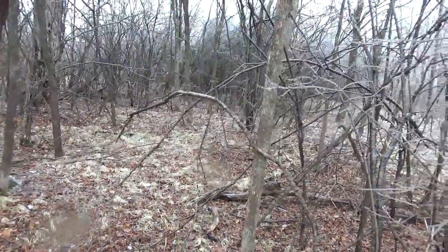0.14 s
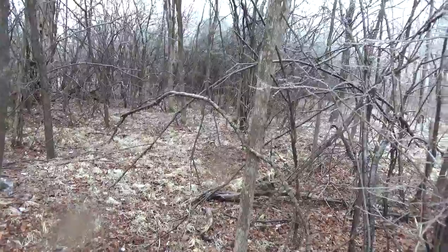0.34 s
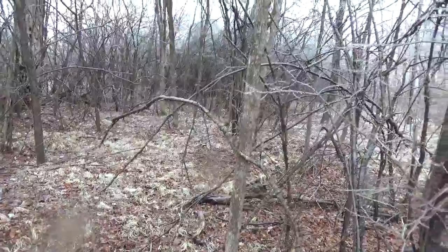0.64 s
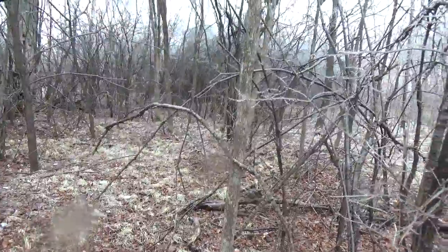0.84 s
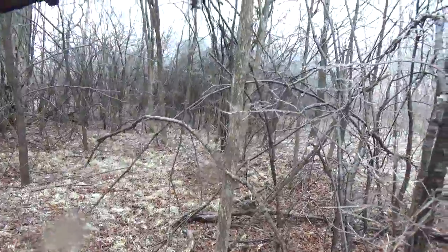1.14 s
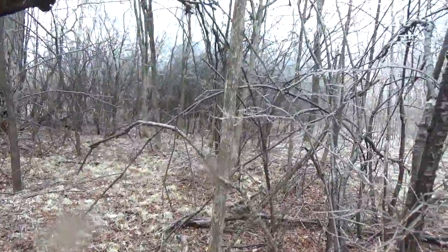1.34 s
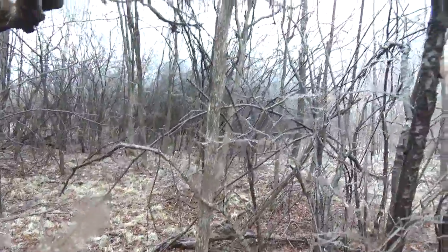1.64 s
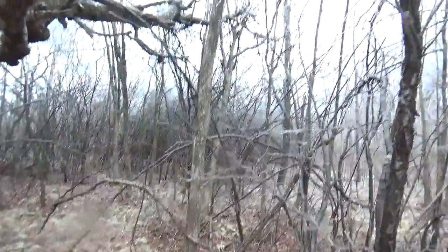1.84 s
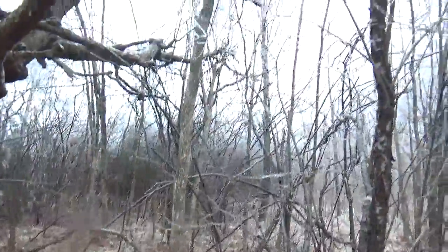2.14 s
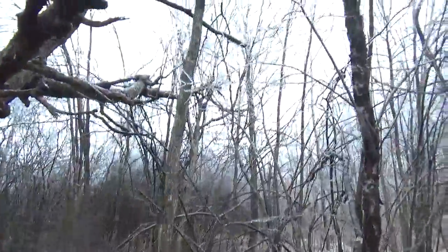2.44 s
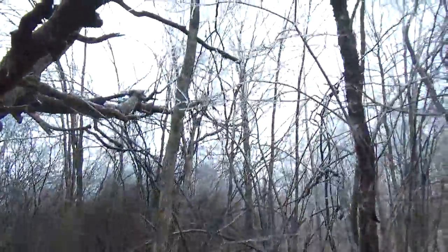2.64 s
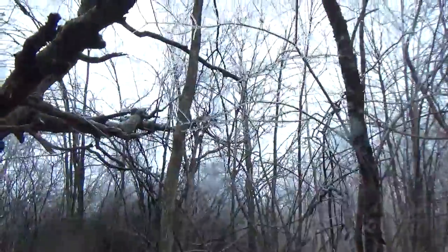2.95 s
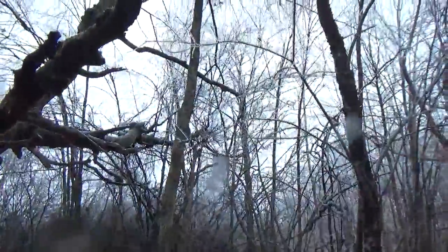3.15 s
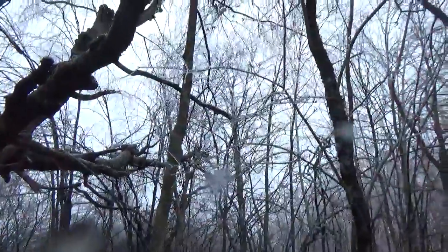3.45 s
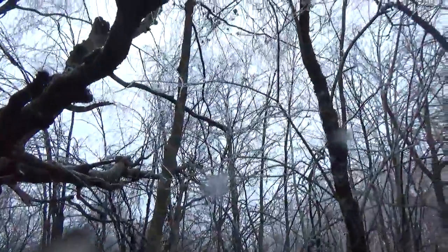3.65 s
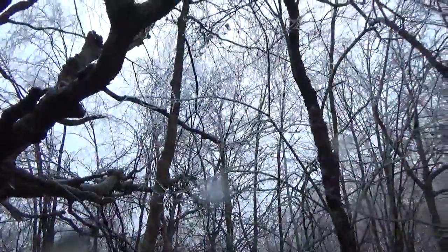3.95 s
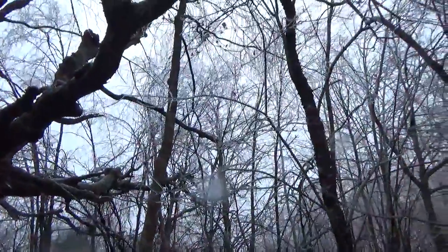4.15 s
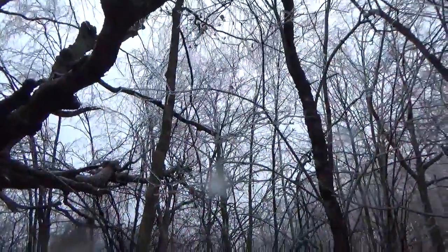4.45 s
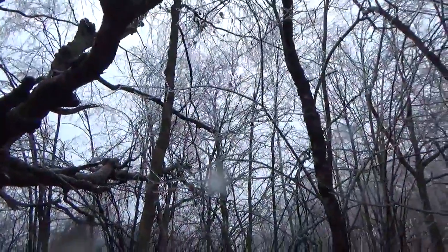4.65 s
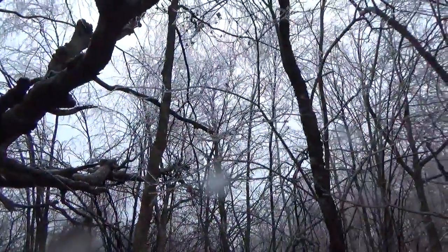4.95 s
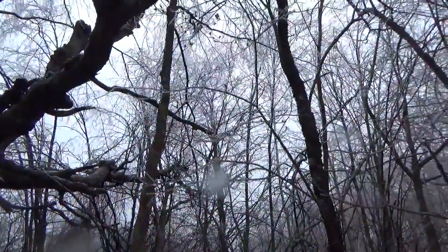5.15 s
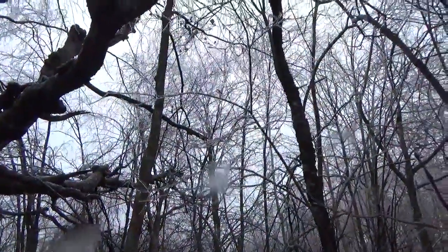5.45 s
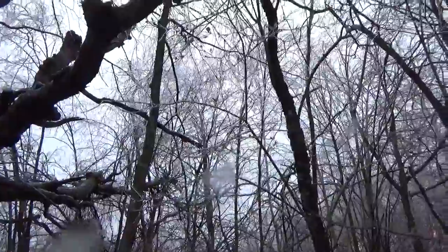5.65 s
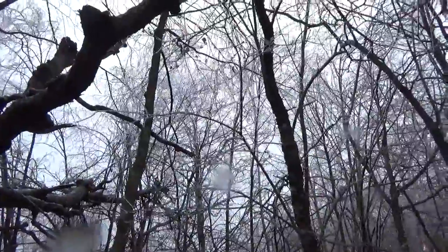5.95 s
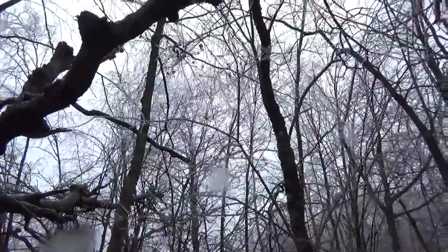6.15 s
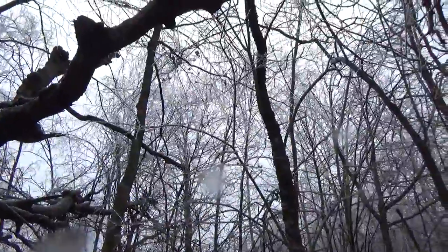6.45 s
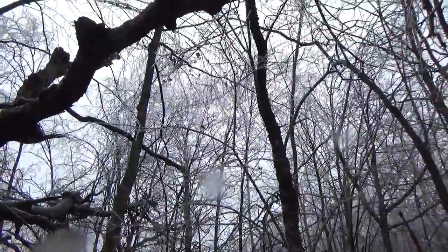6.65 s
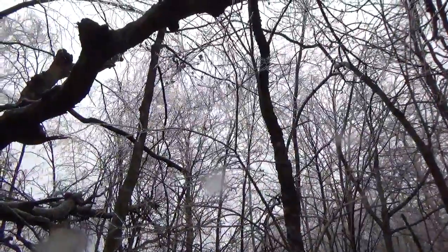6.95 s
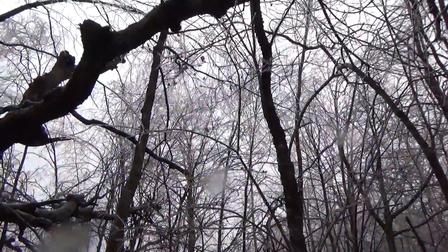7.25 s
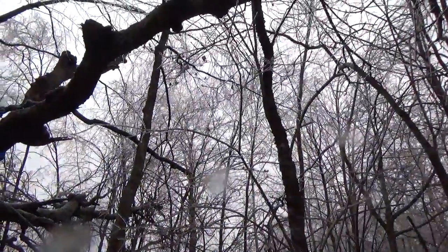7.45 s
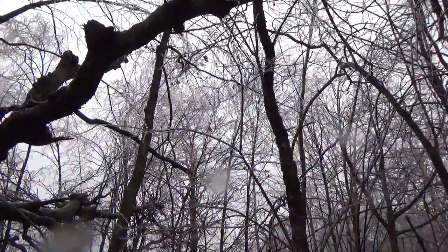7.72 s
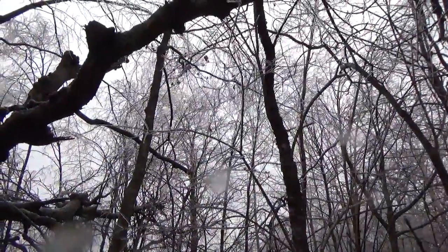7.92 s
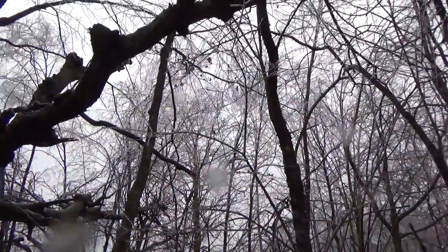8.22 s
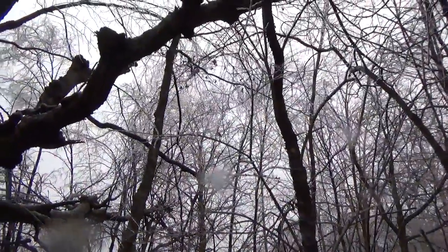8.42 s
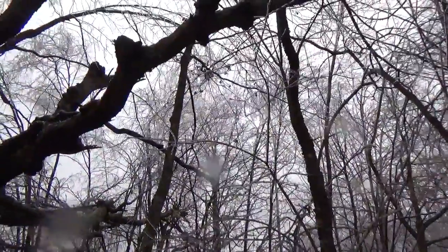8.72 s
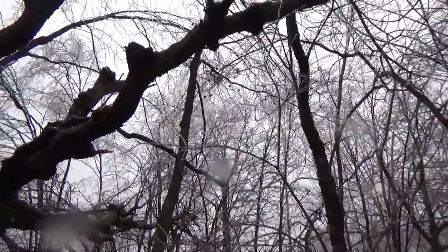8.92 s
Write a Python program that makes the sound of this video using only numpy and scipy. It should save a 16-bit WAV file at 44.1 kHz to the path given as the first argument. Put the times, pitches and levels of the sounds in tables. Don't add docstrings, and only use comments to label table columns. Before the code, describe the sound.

Fine sleet sizzles evenly through leafless trees while close pellets snap and click, densest early on, over a faint low murmur and light wind bumps.

```python
import sys
import numpy as np
from scipy import signal
from scipy.fft import rfft, irfft, next_fast_len
from scipy.io import wavfile
from scipy.ndimage import uniform_filter1d, map_coordinates

SR = 44100
rng = np.random.default_rng(int(sys.argv[2]) if len(sys.argv) > 2 else 0)


def dump_mix(stems):
    frames = np.atleast_2d(stems).T
    limited = np.clip(frames, -1, 1)
    pcm = np.round(limited * 32767).astype(np.int16)
    wavfile.write(sys.argv[1], SR, pcm)


def gain_from_decibels(decibels):
    exponent = np.asarray(decibels, float) / 20
    return 10 ** exponent


N = 400428

# [t/s, level/dB]
RAIN_STRENGTH = [(0.0, -39), (0.93, -38.5), (1.09, -38.5), (1.97, -38), (2.17, -40), (2.65, -39),
                 (3.19, -39.5), (3.87, -41), (4.78, -39), (5.06, -40), (6.32, -40.5), (6.55, -42),
                 (7.26, -39.5), (7.66, -41.5), (8.52, -39.5), (9.08, -39)]
# [t/s, left over right/dB, murmur level/dB]
CAMERA_TURN = [
    (0, 0, -52.5),
    (.9, -0.5, -51.5),
    (3.2, -.5, -51),
    (3.5, -.7, -53.5),
    (6, -0.9, -53),
    (7.7, .5, -53),
    (9.08, .5, -52),
]
# [f/Hz, level per Hz/dB]
SIZZLE_TONE = [(1500, -50), (4000, -11), (6000, -9), (7500, -2), (9000, 2.8), (10300, -2), (11000, -5),
               (20000, -5)]
# [f/Hz, level per Hz/dB]
PATTER_TONE = [(300, -12.5), (800, -4.5), (1600, -1), (2800, 1), (4500, -1.5), (7000, -1.5), (12000, -16)]
# [f/Hz, level per Hz/dB]
MURMUR_TONE = [(40, -14), (90, -3), (150, -1), (300, -4.5), (600, -7.5), (1200, -12), (4000, -53)]
# [f/Hz, likeness/0 to 1]
LIKENESS = [(60, 0.97), (140, 0.98), (350, 0.89), (840, 0.71), (2010, 0.59), (4840, 0.54), (11600, 0.87)]
# (f/Hz, width/Hz, level/dB)
ENGINE = (112, 2.6, -61.5)
# [t/s, level/dB]
BREEZE_STRENGTH = [
    (0, -58.5),
    (3.6, -60),
    (4.7, -55.5),
    (5.5, -51.5),
    (5.7, -62.5),
    (7.6, -54),
    (9.08, -60),
]
# [f/Hz, level per Hz/dB]
BREEZE_TONE = [(15, -16), (28, -4.5), (60, -4), (95, -7), (200, -31)]
# [t/s, peak level/dB, f/Hz, left over right/dB]
LEAF_HITS = [(.1378, -30, 3070, -9), (.2408, -32, 2340, -4), (.5743, -31, 2850, 4),
             (.6007, -22.5, 1870, -3), (.72, -21.5, 1490, 0), (.9266, -28, 2440, -6),
             (2.4968, -25, 1350, 6), (6.2113, -22, 1440, -12), (.964, -28, 2010, -6),
             (1.0377, -24, 2630, -7), (1.0751, -29.5, 2510, 5), (1.2085, -32, 1600, -2),
             (1.3111, -32, 2600, -10), (.8725, -29, 3100, -3), (1.4696, -31, 2900, -4),
             (1.5611, -33, 1570, 1), (1.8653, -32, 3290, -6), (2.7879, -30, 2100, 5),
             (2.8145, -35, 1970, -11), (2.8936, -32, 1580, -4), (3.2067, -30, 2240, 5),
             (3.8171, -39, 1630, -1), (4.59, -31, 2190, -4), (6.3182, -26, 2700, 10),
             (6.7955, -43, 2700, 25), (6.8077, -30, 2720, -9), (7.3107, -29.5, 3010, 3),
             (7.3782, -33, 3040, 4), (8.5444, -29, 2500, -1)]
# [t/s, peak level/dB, f/Hz, left over right/dB]
TWIG_HITS = [(.148, -23.5, 3880, -5), (.3193, -21, 3200, -6), (.3277, -21, 4160, -5),
             (.3448, -24, 3120, -3), (.4645, -20, 5040, -3), (.4903, -27, 5860, -2),
             (.5932, -18.5, 3650, -4), (.6765, -16, 5800, -5), (.9107, -21, 4680, -4),
             (.9341, -29, 3080, -4), (1.0833, -22, 5960, 1), (1.342, -16.5, 4900, -4),
             (2.0733, -24, 5000, -4), (1.8073, -25, 5560, -4), (1.8498, -24, 4430, -2),
             (1.9766, -27, 5000, -2), (2.3859, -14.5, 3330, -3), (2.4547, -27, 4120, -3),
             (3.2066, -24, 6550, 1), (4.7977, -29, 3590, 1), (5.092, -28, 4340, -5),
             (5.6703, -30, 4390, 10), (6.1587, -29, 5280, -1), (7.0648, -29.5, 4680, -9),
             (7.1244, -28, 4210, -4), (7.1298, -23, 3270, 2), (7.2388, -32, 4180, 2),
             (7.9083, -26, 5980, -2), (8.3255, -24.5, 5070, -2), (8.3845, -21.5, 3380, 2)]
# [t/s, peak level/dB, f/Hz, left over right/dB]
GLAZE_HITS = [(.1845, -25, 7490, -1), (.7198, -14, 7200, -1), (.7201, -14, 9800, 1), (.743, -26, 8700, 2),
              (.751, -23, 9080, 1), (.9883, -24.5, 7000, -6), (1.3746, -24, 7650, -5),
              (1.5166, -25, 7750, -3), (1.6784, -24, 9010, 5), (1.8509, -24, 9500, -2),
              (1.9766, -16, 7900, -2), (2.0733, -15.5, 8300, -2), (2.1159, -18.5, 7400, -3),
              (2.4502, -24, 9730, -5), (2.6114, -23, 8850, 2), (2.788, -22.5, 8600, -2),
              (3.1735, -25, 8080, 2), (3.5375, -22, 8060, 4), (3.795, -29, 8000, 15), (3.978, -23, 8960, 1),
              (4.3124, -22, 8250, 1), (4.459, -23, 8930, 4), (4.8196, -17, 8750, 4), (6.3215, -25, 7200, 0),
              (7.3061, -23, 8860, 3), (7.7022, -21.5, 9200, 3), (8.0628, -24, 9000, -4),
              (8.293, -22, 8680, 1), (8.6297, -34, 8880, -3), (8.7474, -19.5, 8630, 3)]
# [t/s, level/dB, f/Hz, left over right/dB]
PLINK_DROPS = [
    (0.144, -37, 1710, -2),
    (0.464, -33, 1850, -4),
    (1.3103, -30.5, 1660, -7),
    (1.3474, -31.5, 1620, -3),
    (1.4672, -31, 1340, -2),
    (8.3255, -26, 5100, -2),
    (8.386, -40, 1790, 4),
]
# [t/s, level/dB, first f/Hz, last f/Hz, left over right/dB]
PLOP_DROPS = [
    (0.7206, -23, 1700, 700, 0),
    (.7463, -29.5, 800, 200, -2),
    (.7513, -21, 1280, 860, 1),
    (2.4974, -31, 710, 176, 3),
    (2.5024, -26, 2200, 905, 4),
    (4.7915, -32.5, 700, 530, 3),
    (6.2111, -22.5, 1300, 470, -2),
    (6.2188, -28, 450, 1070, -6),
]
# [t/s, length/s, level/dB, centre f/Hz]
SPRAYS = [(0.321, 0.024, -35, 4000), (0.445, 0.025, -33.5, 6300), (0.744, 0.011, -34, 700),
          (0.74, 0.033, -39, 210), (0.741, 0.018, -33, 2000), (4.8, 0.021, -41.5, 1100),
          (4.755, 0.022, -42, 990), (0.74, 0.04, -30, 7400), (0.928, 0.063, -44, 2400),
          (1.999, 0.036, -41, 9000), (2.095, 0.068, -33.5, 11000), (2.394, 0.026, -30.5, 11000),
          (2.496, 0.011, -33, 220), (2.441, 0.29, -45.5, 1600), (2.438, 0.22, -38.5, 9200),
          (8.203, 0.18, -44, 3400), (4.1, 0.24, -48, 10000), (4.451, 0.048, -34, 10500),
          (4.826, 0.12, -36.5, 11000), (6.153, 0.036, -36.5, 3500), (6.226, 0.02, -39, 900),
          (6.793, 0.028, -43.5, 2500), (8.297, 0.048, -38.5, 9700), (8.746, 0.045, -37.5, 6300)]
# [t/s, peak level/dB, f/Hz]
AIR_PUFFS = [
    (2.661, -40, 55.3),
    (3.85, -47, 45.2),
    (4.549, -34.5, 60),
    (4.77, -51, 45),
    (5.47, -43, 109),
    (7.734, -29.5, 42.7),
    (7.81, -56, 45),
    (8.0, -42, 45),
    (8.24, -48, 35),
]


def unit(x):
    return x / np.sqrt(np.mean(x ** 2) + 1e-20)


def along(points, hz):
    f, v = np.transpose(points)
    return np.interp(np.log(hz + 1), np.log(f + 1), v)


def curves(rows):
    s, *columns = np.transpose(rows)
    return [np.interp(np.arange(N) / SR, s, column) for column in columns]


def wobble(rate):
    knots = rng.standard_normal(int(N * rate / SR) + 4)
    return map_coordinates(knots, [np.arange(N) * rate / SR])


def filtered(x, response):
    m = next_fast_len(x.shape[-1] + 8192)
    spectrum = rfft(x, m) * response(np.fft.rfftfreq(m, 1 / SR))
    return irfft(spectrum, m)[..., :x.shape[-1]]


def panned(db):
    return gain_from_decibels(np.array([db / 2, -db / 2]))


def add(out, s, sound):
    part = out[:, max(round(s * SR), 0):][:, :sound.shape[1]]
    part += sound[:, :part.shape[1]]


def rush(tone, patchy_db):
    z = signal.stft(rng.standard_normal((2, N)), nperseg=256)[2]
    patches = uniform_filter1d(rng.standard_normal(z.shape[1:]), size=8, axis=0)
    patches = uniform_filter1d(patches, size=10, axis=1)
    pair = signal.istft(z * gain_from_decibels(patchy_db * unit(patches)), nperseg=256)[1][:, :N]

    def middle_and_side(hz):
        angle = np.arccos(np.clip(along(LIKENESS, hz), -1, 1)) / 2
        return gain_from_decibels(along(tone, hz)) * np.array([np.cos(angle), np.sin(angle)])

    mid, side = filtered(pair, middle_and_side)
    return unit(np.array([mid + side, mid - side]))


def pitter(count, hz, octaves, cycles, scatter_db):
    when, size, side, tone, phase = rng.random((count, 5)).T[..., None]
    pitch = hz * 2 ** (octaves * (2 * tone - 1))
    n = np.arange(SR // 300)
    ring = np.sin(2 * np.pi * (pitch * n / SR + phase)) * np.exp(-pitch * n / SR / cycles)
    ring = ring * gain_from_decibels(-scatter_db * np.log(size + .02))
    at = ((when * N).astype(int) + n).ravel()
    gains = panned(14 * (side - .5))
    return unit(np.array([np.bincount(at, (gain * ring).ravel(), N)[:N] for gain in gains]))


def rainfall():
    fall_db, = curves(RAIN_STRENGTH)
    mean_db = fall_db.mean()
    swing_db = fall_db - mean_db
    flurry = wobble(25)
    ice = rush(SIZZLE_TONE, patchy_db=1.12)
    ice = ice + gain_from_decibels(-11.5) * pitter(count=3000, hz=8100, octaves=0.52, cycles=0.85, scatter_db=6.5)
    leaves = rush(PATTER_TONE, patchy_db=0.82)
    leaves = leaves + gain_from_decibels(-10) * pitter(count=2000, hz=2900, octaves=1.0, cycles=1.5, scatter_db=2.0)
    sizzle = gain_from_decibels(mean_db - 0.5 + 1.43 * swing_db + 1.06 * flurry) * ice
    patter = gain_from_decibels(mean_db - 3.5 + 0.77 * swing_db + 0.66 * flurry) * leaves
    hard = pitter(count=700, hz=4550, octaves=0.71, cycles=0.44, scatter_db=2.5)
    snaps = gain_from_decibels(mean_db - 19 + swing_db) * hard
    lean_db = curves(CAMERA_TURN)[0]
    return (sizzle + patter + snaps) * panned(lean_db)


def wood_murmur():
    murmur_db = curves(CAMERA_TURN)[1]
    return gain_from_decibels(murmur_db + 1.5 + 0.6 * wobble(2.75)) * rush(MURMUR_TONE, patchy_db=.8)


def engine_drone():
    hz, width_hz, db = ENGINE
    hum = filtered(rng.standard_normal(N), lambda f: np.exp(-((f - hz) / width_hz) ** 2))
    return gain_from_decibels(db) * unit(hum)


def breeze():
    t, swell_s, swell_db = np.arange(N) / SR, 0.054, -56.5
    stir = sum(np.exp(-((t - s) / swell_s) ** 2) for s, *_ in AIR_PUFFS)
    strength = gain_from_decibels(curves(BREEZE_STRENGTH)[0] + 1.5) + gain_from_decibels(swell_db) * stir
    return strength * rush(BREEZE_TONE, patchy_db=2.0)


def pellets(hits, spread_hz):
    out, t = np.zeros((2, N)), np.arange(SR // 50) / SR
    rise = 0.15 / spread_hz
    for s, db, hz, pan_db in hits:
        falling = hz * t * (1.1 - 0.025 * t / rise)
        swell = t / rise * np.exp(1 - t / rise)
        blow = swell * np.sin(2 * np.pi * falling + rng.uniform(0, 2 * np.pi))
        crack = gain_from_decibels(-13 - 60 * t / .002) * np.sign(rng.standard_normal(len(t)))
        noise = rng.standard_normal((2, len(t)))
        rough = unit(filtered(noise, lambda f: np.exp(-((f - hz) / (5.8 * spread_hz)) ** 2)))
        rattle = gain_from_decibels(-14.5 - 60 * t / 0.027) * (1 - np.exp(-t / rise)) * rough
        no_bass = signal.butter(2, 0.29 * hz, 'high', fs=SR)
        tick = signal.lfilter(*no_bass, blow + crack + rattle)
        add(out, s - rise, gain_from_decibels(db + 2.5) * panned(pan_db)[:, None] * tick)
    return out


def drips():
    out, t = np.zeros((2, N)), np.arange(SR // 4) / SR
    drops = [(s, db, hz, hz, pan_db, 6) for s, db, hz, pan_db in PLINK_DROPS]
    drops += [(*row, 1.24) for row in PLOP_DROPS]
    for s, db, first_hz, last_hz, pan_db, cycles in drops:
        life = cycles / min(first_hz, last_hz)
        glide_s = 0.22 * life
        hz = last_hz + (first_hz - last_hz) * np.exp(-t / glide_s)
        fade = np.exp(-t / life) * (1 - np.exp(-t / .0003))
        tone = -np.sin(2 * np.pi * np.cumsum(hz) / SR) * fade
        add(out, s, gain_from_decibels(db) * panned(pan_db)[:, None] * tone)
    return out


def spray():
    out, t = np.zeros((2, N)), np.arange(SR // 4) / SR
    for s, length, db, hz in SPRAYS:
        specks = rng.standard_normal((3, len(t))) * gain_from_decibels(1.4 * rng.standard_normal(len(t)))
        both_sides = specks[0] + 0.5 * specks[1:]
        hiss = unit(filtered(both_sides, lambda f: np.exp(-(np.log((f + 1) / hz) / 1.05) ** 2)))
        swell_and_die = (1 - np.exp(-t / 0.0025)) * np.exp(-(t / length) ** 2)
        add(out, s, gain_from_decibels(db) * hiss * swell_and_die)
    return out


def puffs():
    out, t = np.zeros((2, N)), np.arange(-SR // 20, SR // 20) / SR
    for s, peak_db, hz in AIR_PUFFS:
        push = -np.cos(2 * np.pi * hz * t) * np.exp(-(2.0 * hz * t) ** 2)
        add(out, s + t[0], gain_from_decibels(peak_db) * np.array([push, push]))
    return out


def scene():
    background = rainfall() + wood_murmur() + engine_drone() + breeze()
    leaf_ticks = pellets(LEAF_HITS, spread_hz=670)
    twig_ticks = pellets(TWIG_HITS, spread_hz=1400)
    glaze_ticks = pellets(GLAZE_HITS, spread_hz=950)
    return background + leaf_ticks + twig_ticks + glaze_ticks + drips() + spray() + puffs()


def band_limit(x):
    return signal.sosfilt(signal.butter(12, 12240, fs=SR, output="sos"), x)


def record(dry):
    top_hz, peak_limit = 11020, .6
    band = filtered(dry, lambda hz: np.clip((top_hz + 20 - hz) / 60, 0, 1))
    rounded = band / (1 + np.abs(band / peak_limit) ** 4) ** .25
    return band_limit(rounded)


dry = scene()
out = record(dry)
dump_mix(out)
```